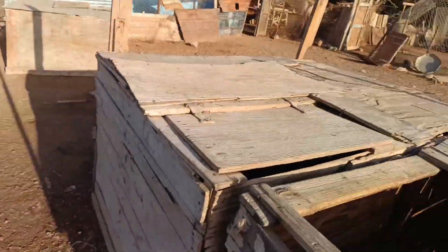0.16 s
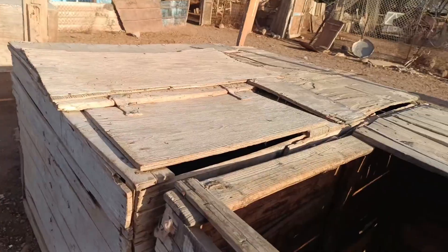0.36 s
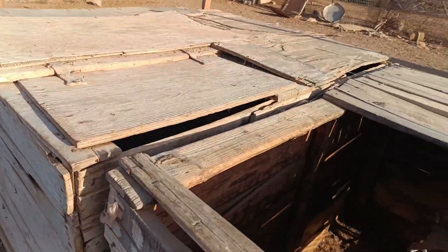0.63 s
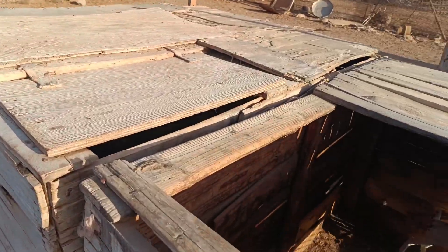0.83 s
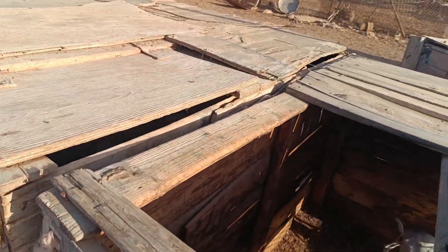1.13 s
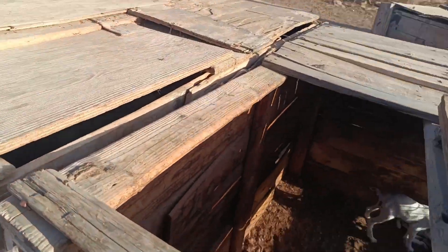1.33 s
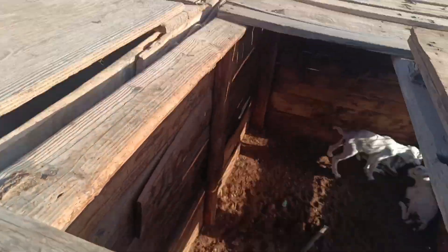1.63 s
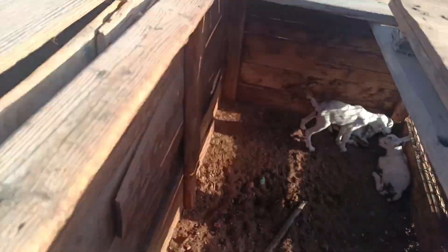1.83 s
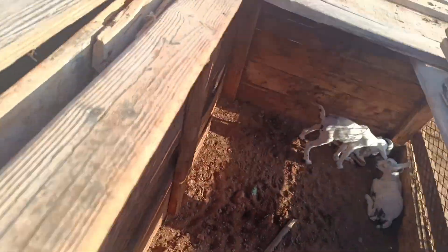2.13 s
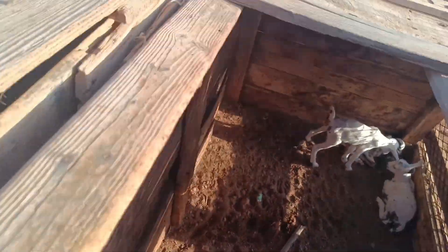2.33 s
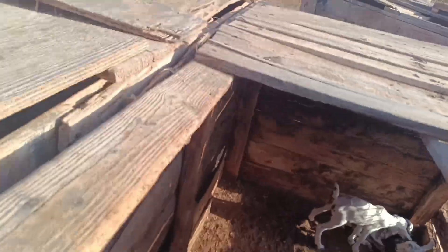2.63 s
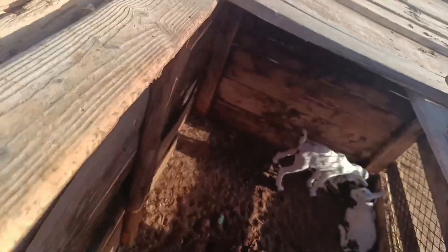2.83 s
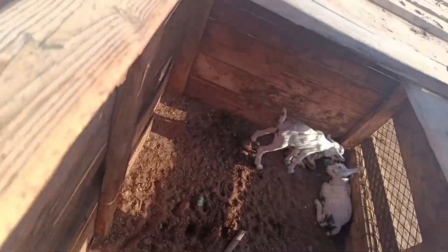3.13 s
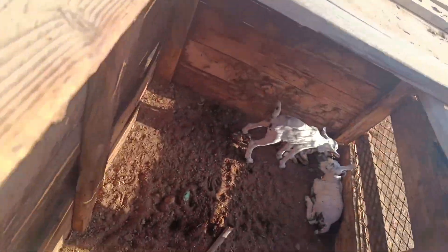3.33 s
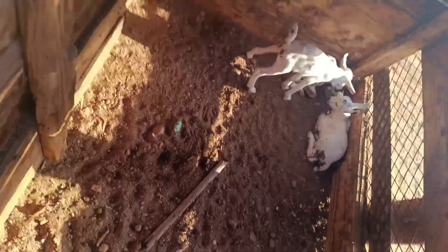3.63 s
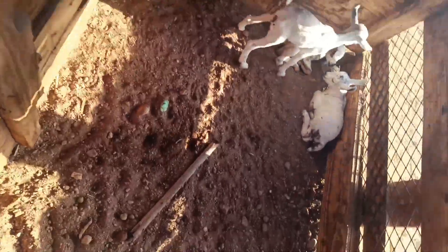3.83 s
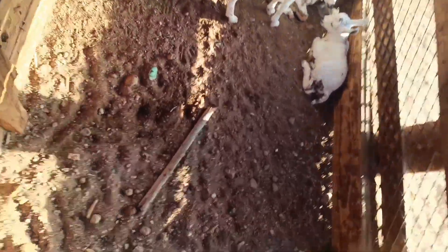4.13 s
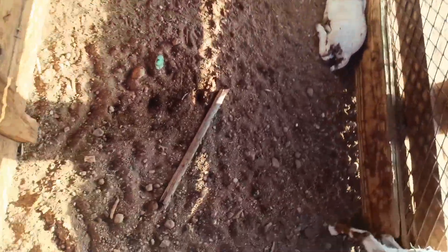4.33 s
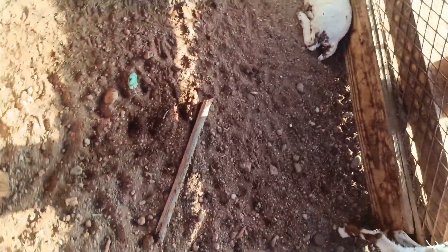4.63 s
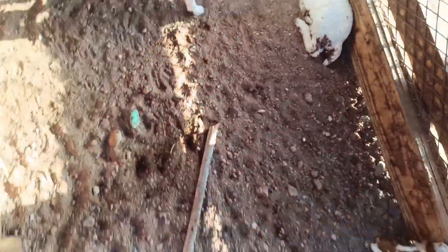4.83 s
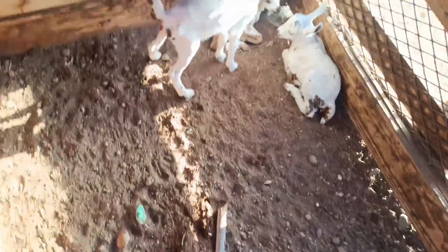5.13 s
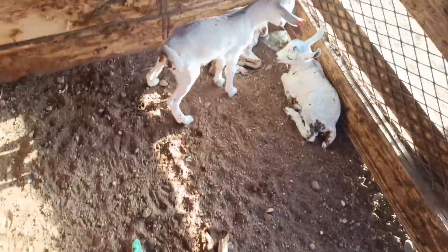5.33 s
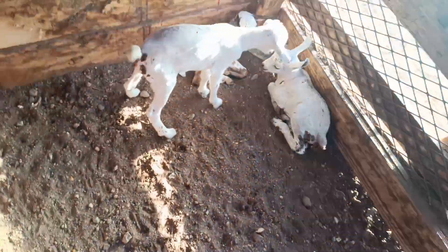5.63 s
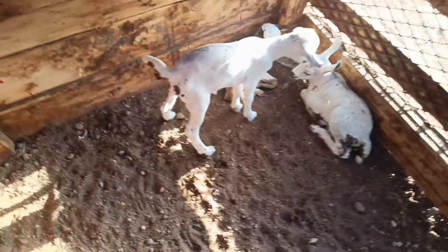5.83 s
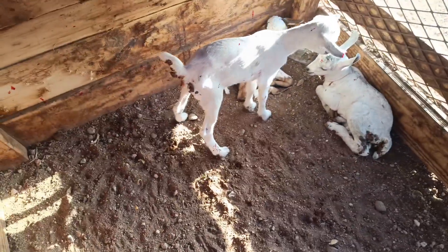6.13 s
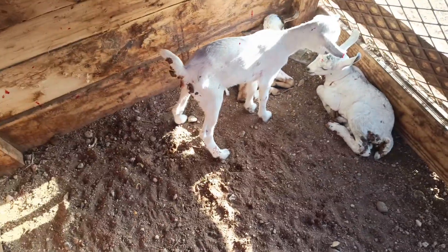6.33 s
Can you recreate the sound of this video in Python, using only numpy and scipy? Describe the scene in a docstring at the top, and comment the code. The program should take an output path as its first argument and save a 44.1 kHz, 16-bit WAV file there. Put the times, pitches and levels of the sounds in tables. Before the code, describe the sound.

Young goats bleat in quick, throbbing cries over each other while a hand rubs and knocks rough wood close by, above a low outdoor rumble.

```python
"""Kid goats in a wooden pen

Kids bleat over each other in quick throbs: unsteady harmonics and breath noise through a throat spectrum.
Hoarse calls (pulse trains through resonances) and most dull bumps (noise puffs) come from further off; one low
bump late on is close by. A hand drags along a rough plank close by (random grains); slips and knocks ring the
plank modes. A low outdoor rumble of coloured noise lies under everything."""
import sys
import numpy as np
from scipy import signal
from scipy.fft import rfft, irfft, next_fast_len
from scipy.io import wavfile
from scipy.ndimage import uniform_filter1d

SR = 44100
rng = np.random.default_rng(int(sys.argv[2]) if len(sys.argv) > 2 else 0)


def generate_wav(signal):
    """Clip the signal to [-1, 1] and save it as 16-bit WAV at the path in sys.argv[1]."""
    frames = np.transpose(np.atleast_2d(signal))
    scaled = np.clip(frames, -1, 1) * 32767
    pcm = np.round(scaled).astype(np.int16)
    wavfile.write(sys.argv[1], SR, pcm)


N = 285327

# Rumble spectrum: freq_hz, density_db [dB per Hz]
RUMBLE_SPECTRUM = [(13, -34.5), (22, -4), (67, -0.5), (141, -11.5), (200, -8.5), (240, -9), (328, -2.5),
                   (430, -11.5), (600, -22.5), (800, -34), (1200, -46.5), (2000, -46.5), (5600, -58),
                   (15000, -58)]
# Rumble swells: time_s, level_db, bass_tilt_db_per_octave
RUMBLE_GUSTS = [(0, -46.5, -2), (.18, -44.5, 1.5), (.31, -58, 2.5), (.54, -54.5, 0), (.92, -44, -1),
                (1.059, -41.5, 1), (1.37, -46.5, 0), (1.8, -52, -1), (2.2, -42.5, 1.5), (2.41, -44, 5),
                (2.54, -39, -4), (2.94, -45.5, 0), (3.3, -44.5, 1.5), (3.44, -48, -1), (3.84, -39, 0),
                (4.18, -43, -0.5), (4.75, -47, 0), (5.481, -40.5, 0), (5.62, -44, 0), (6.47, -40, 1)]
# Dull bumps, most in other pens, the last a low one close by: start_s, onset_level_db, t60_s, band_hz
DULL_BUMPS = [(.008, -51, 0.14, 1760), (1.55, -53.5, 0.23, 3600), (1.853, -67.5, 0.18, 2000),
              (2.885, -37, 0.22, 2000), (2.915, -31, 0.14, 1630), (3.366, -52.5, 0.2, 1507),
              (5.568, -32, 0.15, 150)]
# Hoarse far calls: start_s, attack_s, hold_s, release_s, hold_level_db
HOARSE_CALLS = [(.14, .07, 0.055, 0.17, -70), (0.418, 0.13, 0.089, 0.09, -48.5),
                (1.296, 0.019, 0.22, .04, -64), (1.533, 0.025, 0.0084, 0.11, -57),
                (4.387, 0.044, 0.18, 0.048, -37)]
# Hoarse throat resonances: freq_hz, width_hz (each of two passes), level_db
HOARSE_RESONANCES = [(956, 65, -14.5), (1670, 390, -1), (1850, 170, 0.5)]
# Hand on plank: time_s, rasp_level_db, fine_rasp_db (against rasp)
RUB_LEVELS = [(1.9, -84, -10.5), (1.96, -32, -8.5), (2.05, -34.5, -7), (2.1, -40, -5.5),
              (2.24, -30.5, -4.5), (2.28, -34.5, 1), (2.33, -27.5, -4.5), (2.42, -43.5, -2),
              (2.46, -31, -6), (2.52, -31.5, -2), (2.545, -46, 8), (2.59, -20, -11), (2.635, -42.5, -7),
              (2.66, -27.5, -7.5), (2.69, -47, -5.5), (2.79, -59, 3), (2.87, -46, -5.5), (2.95, -57.5, 0),
              (3.05, -63, -2), (3.12, -49, -1.5), (3.25, -84, 0)]
# Rasp spectra: freq_hz, density_db [dB per Hz]
RASP_SPECTRUM = [(900, -30), (1500, -10), (2050, -2.5), (2900, -15), (4200, -3.5), (5000, -12.5),
                 (7000, -31)]
FINE_RASP_SPECTRUM = [(3500, -28.5), (5200, 2), (6800, 0), (8000, -2.5), (10000, -12), (12500, -28),
                      (15500, -21.5)]
# Jolts of the hand: time_s, low_rasp_db, thud_db
HAND_JOLTS = [(1.962, -53.5, -44.5), (2.04, -47, -49), (2.15, -59, -62), (2.2, -37.5, -73),
              (2.238, -30.5, -42.5), (2.345, -29.5, -38.5), (2.46, -45, -35.5), (2.52, -42.5, -40.5),
              (2.59, -28, -32.5), (2.623, -40, -26), (2.76, -38.5, -43), (2.87, -43, -47),
              (2.95, -39.5, -51), (3.12, -46.5, -65), (3.18, -52.5, -62.5)]
# Single slips and knocks of the wood: time_s, strength_db, hardness_db_per_octave
SINGLE_SLIPS = [(1.5409, -24, 0), (1.965, -24, 0), (1.977, -19, 0), (2.232, -17, -5), (2.2968, -13.7, 0),
                (2.3094, -14.4, 0), (2.3355, -4.5, 0), (2.3798, -18, 0), (2.385, -18, -5),
                (2.4365, -16.6, 0), (2.4506, -9.6, 0), (2.6108, -8, -3), (2.9257, -30.7, -6),
                (2.9453, -38.4, 9), (3.0032, -38.9, 9), (3.0763, -40.7, 9), (3.0993, -37.6, 9),
                (3.1071, -35.4, 9), (3.1129, -32.9, 9), (3.1239, -31.3, 9), (3.1394, -30.7, 9),
                (3.1571, -26, 9), (3.1806, -40.2, 9), (3.6652, -26, -6)]
# Creaks, runs of slips: start_s, slip_count, mean_gap_s, first_strength_db, loss_db_per_slip,
# hardness_db_per_octave
CREAK_RUNS = [(2.3254, 3, .0021, -7, -.5, 0), (2.4573, 15, .003, -7.5, -.2, -1),
              (2.5099, 4, .004, -5, 1.5, 0), (2.582, 2, .002, -7, -2, 0), (2.5916, 4, .003, -4.5, 1.2, 0),
              (2.6205, 4, .0017, -3, 1.5, -1), (2.6557, 4, .0017, -1, 5, 4), (2.8342, 3, .0012, -8, 3, -1)]
# Plank modes: freq_hz, level_db, t60_s
PLANK_MODES = [(684, -14, 0.015), (1131, -9, 0.014), (1635, -6, 0.017), (2145, 0, 0.0069),
               (3010, -5, 0.0054), (4010, 0.5, 0.0047), (5390, -1, 0.0024), (6380, -2, 0.004),
               (9280, -12, 0.0037)]
# Crests and turns of each bleat: time_s, pitch_hz, level_db, jaw_lift_db, following_dip_db
BLEAT_TURNS = [
    [(.82, 506, -68.5, 9, -0.5), (.892, 583, -30, 2, 0.5), (.932, 624, -12, 10, 15),
     (1.016, 623.5, -12.5, 2.5, 16.5), (1.095, 635, -11, 3.5, 14.5), (1.185, 642, -9.5, 6, 12),
     (1.269, 550, -19.5, 14, -0.5), (1.339, 501.5, -58, 0, 0)],
    [(2.03, 516, -46.5, -8, 1.5), (2.122, 545.6, -33.5, -12, -3.5), (2.225, 536, -53, -18, 29.5),
     (2.371, 547, -16.5, 11.5, 12), (2.447, 538.4, -19.5, 2, -5), (2.46, 538, -46, -6, 0)],
    [(2.43, 603, -29, -8, 0), (2.472, 626, -9, 17, 21), (2.57, 624.5, -12.5, 7.5, 17.5),
     (2.655, 627, -22, -0.5, 14.5), (2.713, 453, -28.5, 23, -1), (2.757, 450, -44.5, -6, 0)],
    [(2.93, 412, -48.5, 9.5, 3), (2.966, 435, -46, -2, 6), (3.046, 487, -46.5, -5.5, 4.5),
     (3.155, 477, -45, 11.5, 0), (3.167, 479, -71.5, -7.5, -1.5)],
    [(3.52, 538, -77.5, -10, -0.5), (3.61, 532, -39, 13.5, 5), (3.672, 532, -21, 14, 7),
     (3.773, 534.6, -24, 2, 12), (3.877, 510.5, -26, 2.5, 8.5), (3.99, 470, -28.5, 10, 15),
     (4.047, 431, -27, 31, -1), (4.059, 396, -56, -7, 0)],
    [(3.68, 532, -37, 0, 0), (3.708, 527, -34, -24, 10), (3.79, 592.6, -18.5, 14.5, 16),
     (3.9, 594.4, -19, 11.5, 13.5), (4.005, 600.5, -17.5, 10, 13.5), (4.131, 536.3, -25, -3, 1),
     (4.179, 491, -41.5, -23, -0.5), (4.2, 485, -58, -26, 0)],
    [(4.16, 461, -49, -9, 2), (4.19, 451.6, -34, 3.5, 5), (4.29, 411, -35, 18, 0),
     (4.32, 370, -54.5, 4, -1)],
    [(4.33, 426, -55, 0, 0), (4.364, 461, -38, -5, 6.5), (4.396, 530, -43.5, -2, 12),
     (4.442, 556.4, -31.5, 5, 2.5), (4.512, 593.6, -42.5, -7, 2), (4.615, 596, -47.5, -1, -2.5),
     (4.655, 645, -35, -10, 3), (4.67, 647, -50, -10, 0)],
    [(4.64, 537, -59, -9, 1), (4.676, 583, -16.5, 21.5, 0.5), (4.696, 612, -10, 15, 11),
     (4.778, 606, -12, 6.5, 13), (4.856, 616.5, -12, 4, 11.5), (4.959, 633, -7, 11.5, 15.5),
     (5.059, 626.6, -11, 7, 6), (5.161, 613.4, -15.5, -9, 6), (5.221, 586.6, -19, 7.5, 8),
     (5.265, 451.3, -11, 31.5, -0.5), (5.285, 455, -44, 23, -1), (5.316, 443, -75, 17, 0.5)],
    [(5.53, 542, -69.5, -6, 1), (5.576, 606, -24.5, 15.5, 18.5), (5.662, 615, -23.5, 2.5, 17),
     (5.75, 614, -24, -0.5, 16.5), (5.835, 620, -26.5, 7, 0.5), (5.867, 632, -22.5, -7, 25.5),
     (5.93, 623, -23.5, 2.5, 12), (6.065, 615, -22, 2.5, 14), (6.181, 616, -17, -0.5, 22),
     (6.286, 617.4, -19.5, -15, -1), (6.328, 620, -29.5, 8.5, -2), (6.35, 620, -55, 9, 0)],
    [(5.81, 477, -47, 0, 0), (5.872, 533.7, -27, 15, 12), (5.964, 576.2, -19, 9, 13),
     (6.069, 629, -16, 14, 13), (6.179, 630.5, -17, 15.5, 11.5), (6.29, 615, -19.5, 8.5, 9.5),
     (6.369, 481.3, -24, 23, 4.5), (6.409, 480, -18.5, 34, 0.5), (6.465, 458, -45, 10, 2)],
]
# Slackening of each bleat in its dips: pitch_sag_hz_per_db, sag_share_when_fallen, jaw_drop_db_per_db,
# firm_share (of the gap, beside each crest), fall_share, rise_share
BLEAT_SLACK = [(2, .9, 0.7, .1, .25, .45), (0.4, .9, 0.4, .08, 0.38, .3), (1.25, 1.2, 1.04, .08, 0.41, .35),
               (0.4, .9, .2, .08, .4, .35), (0.6, 0.903, 1.2, 0.059, .4, .35), (4, .9, 2, .04, .15, .25),
               (0, .9, 2.5, .08, 0.41, 0.082), (0.2, .9, .4, 0.087, .3, 0.35), (2, .8, .9, .06, .4, .35),
               (2.2, 0.101, 0.4, .06, .35, .16), (6, .9, .8, .03, .33, .45)]
# Throat and mouth colour of each bleat: freq_hz, level_db
BLEAT_THROATS = [
    [(620.0, -23), (1240.0, -7.5), (1870.0, -13), (2490.0, -26), (3110.0, -1.5), (3730.0, -19),
     (4360.0, -15.5), (4980.0, -11), (6220.0, -17.5), (8090.0, -20), (10580.0, -30.5), (14940.0, -83.5)],
    [(540.0, -19), (1090.0, -0.5), (1630.0, -13), (2170.0, -26), (2720.0, -21.5), (3260.0, -26.5),
     (3800.0, -24.5), (4340.0, -31), (4890.0, -27.5), (5430.0, -19.5), (5970.0, -15.5), (7060.0, -28),
     (8690.0, -37.5), (13030.0, -53)],
    [(610.0, -18.5), (1220.0, 0), (1830.0, -18.5), (2450.0, -12), (3060.0, -13.5), (3670.0, -16.5),
     (4280.0, -9), (4890.0, -15), (5500.0, -18), (6120.0, -12), (6730.0, -27), (7950.0, -25.5),
     (9790.0, -43), (14680.0, -63)],
    [(480.0, -18), (950.0, 11), (1430.0, 0), (1910.0, -33), (2390.0, -12), (3340.0, -23), (4770.0, -32),
     (11450.0, -38)],
    [(510.0, -35), (1020.0, -4), (1530.0, -12), (2040.0, -31.5), (2550.0, -24), (3060.0, -9.5),
     (3580.0, -12), (4090.0, -34), (5110.0, -17), (6640.0, -14.5), (8680.0, -27.5), (12260.0, -46)],
    [(550.0, -22), (1100.0, -7.5), (1650.0, -6), (2210.0, -21), (2760.0, -20), (3310.0, -10.5),
     (3860.0, -24), (4410.0, -11), (5510.0, -23), (7170.0, -29), (9370.0, -26), (13230.0, -60)],
    [(450.0, -27), (900.0, -38), (1340.0, -3), (1790.0, -25), (2240.0, -18), (2690.0, -55), (3130.0, -39),
     (3580.0, -22), (4030.0, -35), (4480.0, -11), (4930.0, -52), (5820.0, -32), (7160.0, -35),
     (10750.0, -55)],
    [(590.0, -17), (1170.0, -6.5), (1760.0, -13.5), (2340.0, -39), (2930.0, -21.5), (3510.0, -29),
     (4100.0, -25.5), (4680.0, -15.5), (5270.0, -57), (5850.0, -46), (6440.0, -57), (7610.0, -54),
     (9370.0, -69), (14050.0, -67)],
    [(610.0, -23.5), (1220.0, -7), (1830.0, -10.5), (2430.0, -20.5), (3040.0, -11), (3650.0, -11.5),
     (4260.0, -10.5), (4870.0, -11), (6090.0, -14.5), (7910.0, -24), (10350.0, -32.5), (14610.0, -62.5)],
    [(620.0, -45), (1230.0, -7.5), (1850.0, -11), (2470.0, -22.5), (3080.0, -2.5), (3700.0, -24),
     (4310.0, -13.5), (4930.0, -18.5), (6160.0, -26.5), (8010.0, -34.5), (10480.0, -43), (14790.0, -78)],
    [(590.0, -21), (1190.0, -9.5), (1780.0, -4.5), (2370.0, -2.5), (2960.0, -7), (3560.0, -7.5),
     (4150.0, -14.5), (4740.0, -17), (5930.0, -15.5), (7710.0, -20), (10080.0, -23.5), (14230.0, -44)],
]
# Breath noise of each bleat: level_db (against tone)
BLEAT_BREATH_DB = [-14, -26, -18, -24, -26, -14, -18, -11, -15, -11, -7]
# Pitch unsteadiness of each bleat near its loudest: share
BLEAT_JITTER = [.006, .005, .005, .005, .004, .007, .008, .014, .005, .006, .008]

HOARSE_PULSE_HZ, HOARSE_EDGE_DB = 76, -20.5  # edge: call start and end, against the hold
JOLT_RISE_DB_PER_S, JOLT_FALL_DB_PER_S = 351.5, 350.5
GRAINS_PER_S = 4000
GAP_SCATTER_SHARE, SLIP_SCATTER_DB, MODE_SCATTER_DB = .2, 1.5, 2.0
JAW_HZ, JAW_WIDTH_HZ = 1211, 330
STEADY_DB = 9  # further below its loudest the voice grows unsteady
PEN_T60_S, GOAT_PEN_DB, PLANK_PEN_DB = .1, -16, -23.5
CUTOFF_HZ = 15760


def amp(db):
    """Gain of a level in dB."""
    return 10 ** (np.asarray(db) / 20)


def rms_one(x):
    """Scale to rms 1."""
    return x / np.sqrt(np.mean(x ** 2) + 1e-20)


def at_hz(points, hz):
    """Read a spectrum on a log-frequency axis."""
    freq_hz, level_db = np.array(points)[:, 0], np.array(points)[:, 1]
    return np.interp(np.log(np.maximum(hz, 1)), np.log(freq_hz), level_db)


def span(rows):
    """First sample of a table and its columns at every sample."""
    time_s, *columns = np.transpose(rows)
    at = np.arange(round(time_s[0] * SR), min(round(time_s[-1] * SR), N))
    return at[0], [np.interp(at / SR, time_s, column) for column in columns]


def drift(rate_hz, size):
    """Zero-mean wandering noise: independent normal draws, rate_hz a second, joined by lines."""
    draws = rng.standard_normal(int(size * rate_hz // SR + 2))
    return np.interp(np.arange(size) * rate_hz / SR, np.arange(len(draws)), draws)


def coloured(x, spectrum):
    """Give a white signal a spectrum, rms 1."""
    size = next_fast_len(len(x))
    gain = amp(at_hz(spectrum, np.fft.rfftfreq(size, 1 / SR)))
    return rms_one(irfft(rfft(x, size) * gain, size)[:len(x)])


def bandpass(x, order, low_hz, high_hz):
    """Butterworth band-pass."""
    return signal.sosfilt(signal.butter(order, [low_hz, high_hz], "band", fs=SR, output="sos"), x)


def band(x, low_hz, high_hz):
    """Second-order band-pass, rms 1."""
    return rms_one(bandpass(x, 2, low_hz, high_hz))


def ring(clicks, hz, t60_s):
    """Decaying sine mode, set ringing at height 1 by a unit click."""
    r, w = amp(-60 / (t60_s * SR)), 2 * np.pi * hz / SR
    return signal.lfilter([0, np.sin(w)], [1, -2 * r * np.cos(w), r * r], clicks + 1e-18)


def resonance(x, hz, width_hz):
    """Two-pole peak with gain 1 on top."""
    r = np.exp(-np.pi * width_hz / SR)
    feedback = [1, -2 * r * np.cos(2 * np.pi * hz / SR), r * r]
    return signal.lfilter([(1 - r * r) / 2, 0, (r * r - 1) / 2], feedback, x)


def pen(x):
    """Plank walls return a short, dulled tail."""
    t = np.arange(round(.4 * SR)) / SR
    dulled = signal.lfilter([1], [1, -.5], rng.standard_normal(len(t)))
    tail = dulled * amp(-60 * t / PEN_T60_S) * (t > .004)
    return signal.fftconvolve(x, tail / np.sqrt(np.sum(tail ** 2)))[:N]


def rumble():
    """Far traffic and air: low noise whose bands swell on their own."""
    time_s, *columns = np.transpose(RUMBLE_GUSTS)
    level_db, tilt_db = [np.interp(np.arange(N) / SR, time_s, column) for column in columns]
    noise = coloured(rng.standard_normal(N), RUMBLE_SPECTRUM)
    edges_hz = [15, 45, 90, 180, 280, 450, 900, 16000]
    out = np.zeros(N)
    for low_hz, high_hz in zip(edges_hz, edges_hz[1:]):
        swell_db = 1.5 * drift(7, N) + 1.5 * drift(2, N)
        out += bandpass(noise, 2, low_hz, high_hz) * amp(tilt_db * np.log2(180 / low_hz) + swell_db)
    return out * amp(level_db)


def bumps():
    """Each bump is a band of noise that dies away exponentially."""
    out, t = np.zeros(N), np.arange(SR // 2) / SR
    for start_s, level_db, t60_s, hz in DULL_BUMPS:
        noise = band(rng.standard_normal(len(t)), hz * 0.52, hz * 1.08)
        puff = noise * amp(level_db - 60 * t / t60_s) * np.minimum(t / 0.006, 1)
        out[round(start_s * SR):][:len(t)] += puff
    return out


def hoarse_calls():
    """Slow uneven pulses with rasp in a distant throat, smeared by the yard."""
    cycles = np.cumsum(HOARSE_PULSE_HZ * (1 + 0.035 * drift(24, N))) / SR
    puffs = np.diff(np.floor(cycles), prepend=0) + .035 * rng.standard_normal(N)
    puffs = puffs + .8 * pen(puffs)
    voice = np.zeros(N)
    for hz, width_hz, level_db in HOARSE_RESONANCES:
        once = resonance(puffs, hz, width_hz)
        voice += amp(level_db) * rms_one(resonance(once, hz, width_hz))
    voice = band(voice, 850, 2300)
    gain = np.zeros(N)
    for start_s, attack_s, hold_s, release_s, hold_db in HOARSE_CALLS:
        times_s = start_s + np.cumsum([0, attack_s, hold_s, release_s])
        corners_db = hold_db + HOARSE_EDGE_DB * np.array([1, 0, 0, 1])
        start, (level_db,) = span(np.transpose([times_s, corners_db]))
        gain[start:start + len(level_db)] += amp(level_db)
    return voice * uniform_filter1d(gain, size=600)


def jolts(start, size):
    """Gains of low rasp and thud: each jolt swells and dies at a steady rate in dB."""
    time_s, *levels_db = np.transpose(HAND_JOLTS)
    since_s = (start + np.arange(size)) / SR - time_s[:, None]
    shape_db = np.minimum(JOLT_RISE_DB_PER_S * since_s, -JOLT_FALL_DB_PER_S * since_s)
    return [np.sum(amp(level_db[:, None] + shape_db), axis=0) for level_db in levels_db]


def rub():
    """Skin catches on the grain thousands of times a second; the push shakes the microphone as a thud."""
    start, (rasp_db, fine_db) = span(RUB_LEVELS)
    size, out = len(rasp_db), np.zeros(N)
    grains = (rng.random((3, size)) < GRAINS_PER_S / SR) * rng.standard_normal((3, size))
    grains = grains * amp(2.5 * np.array([drift(90, size) for _ in grains]))
    rasp = amp(rasp_db) * coloured(grains[0], RASP_SPECTRUM)
    fine_rasp = amp(rasp_db + fine_db) * coloured(grains[1], FINE_RASP_SPECTRUM)
    low_rasp = band(grains[2], 500, 1200)
    thud = band(rng.standard_normal(size), 30, 480) * amp(3.0 * drift(40, size))
    low_gain, thud_gain = jolts(start, size)
    out[start:start + size] = rasp + fine_rasp + low_gain * low_rasp + thud_gain * thud
    return out


def slips():
    """Single slips and the uneven runs of the creaks as one list."""
    rows = list(SINGLE_SLIPS)
    for start_s, count, gap_s, first_db, loss_db, hardness_db in CREAK_RUNS:
        for k, (late, strong) in enumerate(rng.standard_normal((count, 2))):
            time_s = start_s + gap_s * (k + GAP_SCATTER_SHARE * late * (k > 0))
            rows.append((time_s, first_db - loss_db * k + SLIP_SCATTER_DB * strong, hardness_db))
    return np.transpose(rows)


def creak():
    """Each slip strikes the plank modes and briefly tears fibres; harder contact favours the treble."""
    time_s, strength_db, hardness_db = slips()
    at = (time_s * SR).astype(int)
    luck = rng.standard_normal((len(at), len(PLANK_MODES)))
    modes = np.zeros(N)
    for k, (hz, mode_db, t60_s) in enumerate(PLANK_MODES):
        treble_db = hardness_db * np.log2(hz / 4000)
        strike_db = strength_db + mode_db - 3.0 + treble_db + MODE_SCATTER_DB * luck[:, k]
        clicks = np.zeros(N)
        clicks[at] = amp(strike_db) * (-1) ** k
        modes += ring(clicks, hz, t60_s)
    tears = np.zeros(N)
    tears[at] = amp(strength_db - 26.5 + .5 * hardness_db)
    tear_gain = signal.lfilter([1], [1, -amp(-60 / (.02 * SR))], tears)
    # no bass radiates, skin is soft
    return tear_gain * band(rng.standard_normal(N), 4000, 10000) + bandpass(modes, 4, 650, 8500)


def throbs(rows, slack):
    """Between crests the voice slackens: level, pitch and jaw fall, rest low and rise again."""
    sag_hz, early, jaw_db, hold, fall, rise = slack
    turns = np.clip([0, hold, hold + fall, 1 - hold - rise, 1 - hold], 0, 1)
    turns = np.maximum.accumulate(turns)[:, None]
    # per dB of dip: time, pitch, level, jaw
    firm = [0, 0, 0.017, 0]
    fallen = [0, early * sag_hz, 0.98, jaw_db]
    lowest = [0, sag_hz, 1, jaw_db]
    slackness = np.array([firm, firm, fallen, lowest, firm])
    rows = np.array(rows)
    gaps = [a[:4] + turns * (b - a)[:4] - slackness * a[4] for a, b in zip(rows, rows[1:])]
    return np.vstack(gaps + [rows[-1:, :4]])


def bleat(rows, throat, breath_db, jitter, shimmer_db=1.5, clear_hz=7500):
    """Harmonics of an unsteady vocal fold pass the throat; air hisses through it once a cycle."""
    start, (pitch_hz, level_db, jaw_db) = span(rows)
    size = len(pitch_hz)
    below_db = level_db - np.max(level_db)
    unsteadiness = jitter * np.clip(-below_db / STEADY_DB, 1, 3)
    pitch_hz = uniform_filter1d(pitch_hz, size=400) * (1 + unsteadiness * drift(150, size))
    phase = 2 * np.pi * np.cumsum(pitch_hz) / SR
    orders = np.arange(1, 17)[:, None]
    hz = orders * pitch_hz
    jaw = np.exp(-((hz - JAW_HZ) / JAW_WIDTH_HZ) ** 2)
    # a weak voice loses its overtones
    slack_db = 0.11 * np.minimum(below_db + 10.5, 0) * np.log2(hz / JAW_HZ)
    shimmer = np.sqrt(orders) * np.array([drift(70, size) for _ in orders])
    gains = amp(at_hz(throat, hz) + jaw * jaw_db + slack_db + shimmer_db * shimmer)
    tone_rms = np.sqrt(uniform_filter1d(np.sum(gains ** 2, axis=0), size=600) / 2)
    gains = gains / (1 + (hz / clear_hz) ** 4)  # high harmonics dissolve into hiss
    # in the dips the folds barely close and air is left
    gains = gains * amp(np.maximum(.5 * np.minimum(below_db + 13, 0), -10))
    start_phases = rng.uniform(0, 2 * np.pi, orders.shape)
    tone = np.sum(gains * np.sin(orders * phase + start_phases), axis=0)
    # turbulence is brighter than the tone
    hiss = [(f, db + 2.5 * np.log2(f / 2000)) for f, db in throat]
    breath = coloured(rng.standard_normal(size) * (1 + 0.42 * np.cos(phase)), hiss)
    voice = tone + amp(breath_db) * breath * np.median(tone_rms)
    return start, amp(uniform_filter1d(level_db, size=300)) * voice / tone_rms


def kids():
    """All bleats, near and far, each with its own throat, breath and slackening."""
    out = np.zeros(N)
    voices = zip(BLEAT_TURNS, BLEAT_SLACK, BLEAT_THROATS, BLEAT_BREATH_DB, BLEAT_JITTER)
    for rows, slack, throat, breath_db, jitter in voices:
        start, call = bleat(throbs(rows, slack), throat, breath_db, jitter)
        out[start:start + len(call)] += call
    return out


def scene():
    """Goats and wood sound in the pen, over the far sounds, the rub and the rumble."""
    background = rumble() + bumps() + hoarse_calls()
    hand, wood, goats = rub(), creak(), kids()
    walls = pen(amp(GOAT_PEN_DB) * goats + amp(PLANK_PEN_DB) * wood)
    return (background + hand + wood + goats + walls)[None]


def record(dry):
    """The loudest peaks are rounded and the top is cut."""
    rounded = dry / (1 + np.abs(dry / .95) ** 4) ** .25
    return signal.sosfilt(signal.cheby2(24, 60, CUTOFF_HZ, fs=SR, output="sos"), rounded)


dry = scene()
out = record(dry)
generate_wav(out)
```